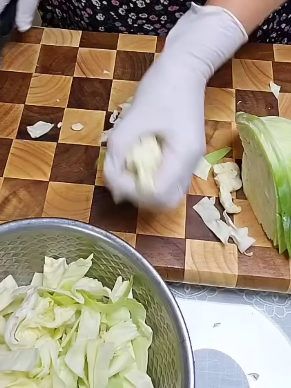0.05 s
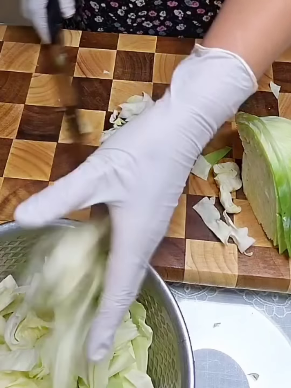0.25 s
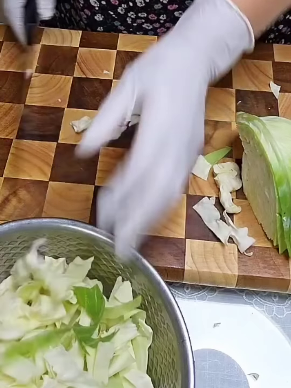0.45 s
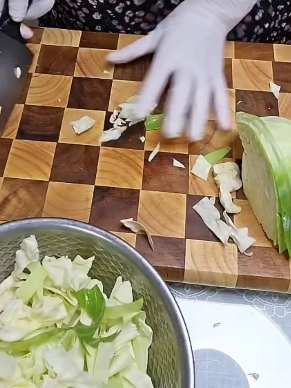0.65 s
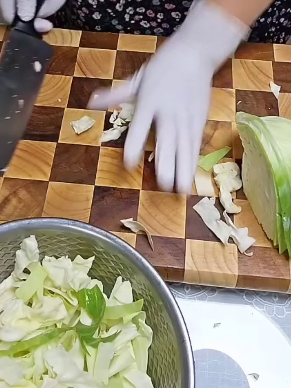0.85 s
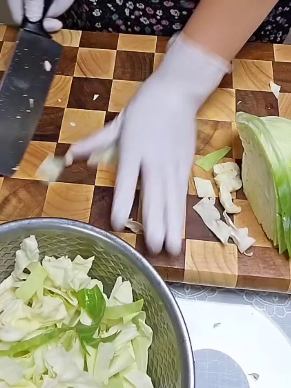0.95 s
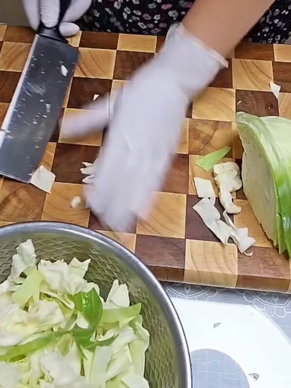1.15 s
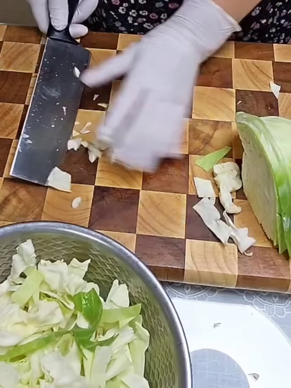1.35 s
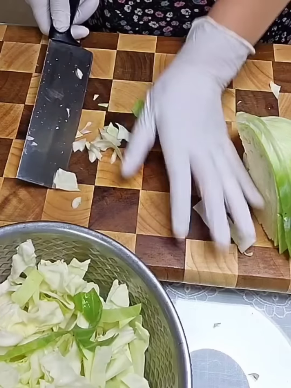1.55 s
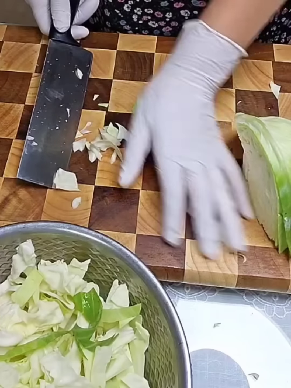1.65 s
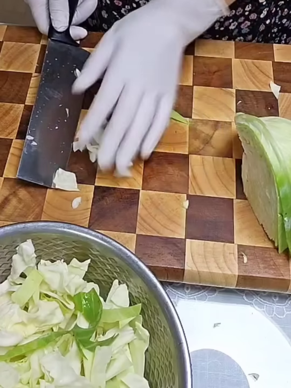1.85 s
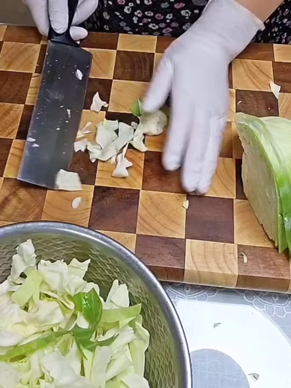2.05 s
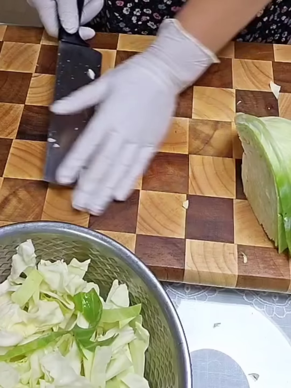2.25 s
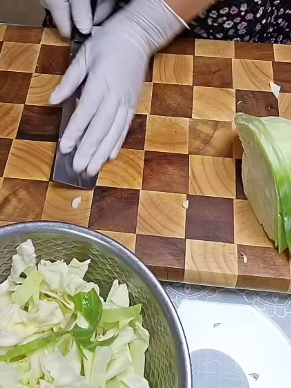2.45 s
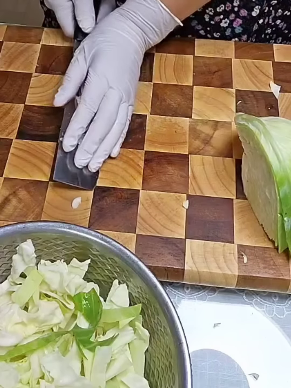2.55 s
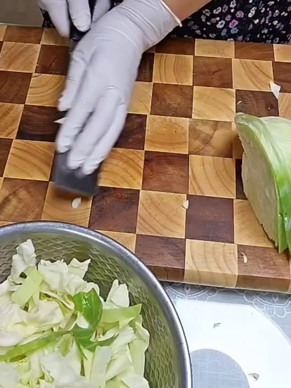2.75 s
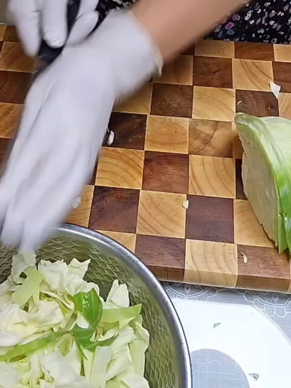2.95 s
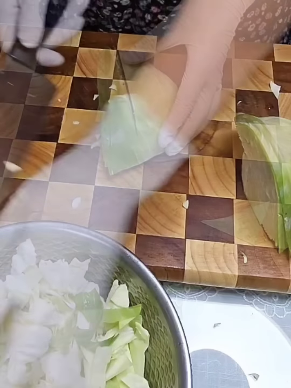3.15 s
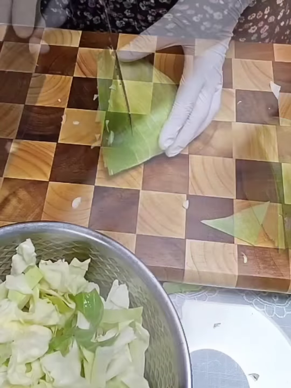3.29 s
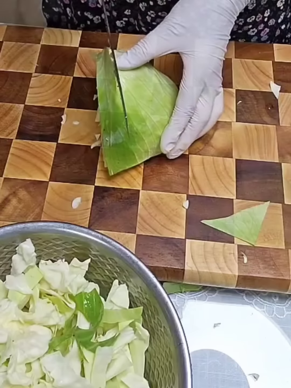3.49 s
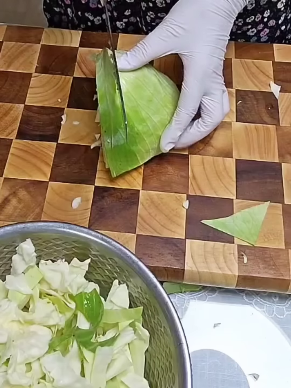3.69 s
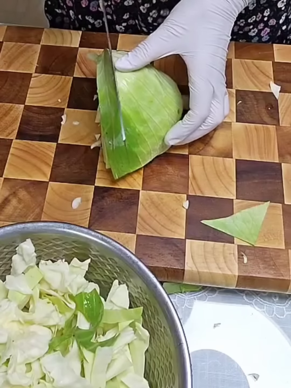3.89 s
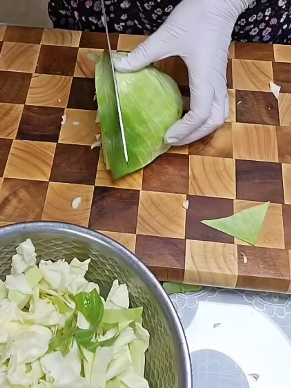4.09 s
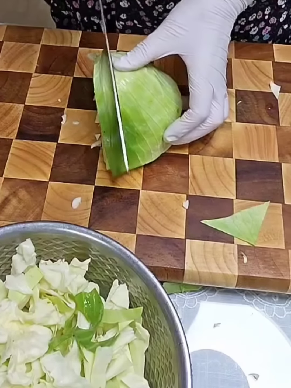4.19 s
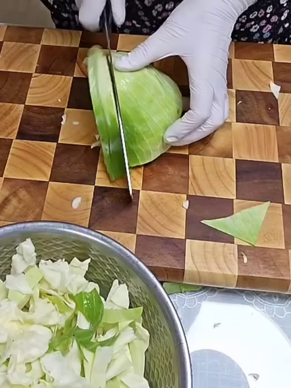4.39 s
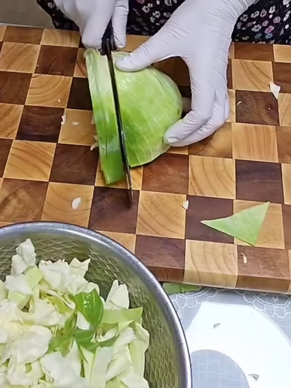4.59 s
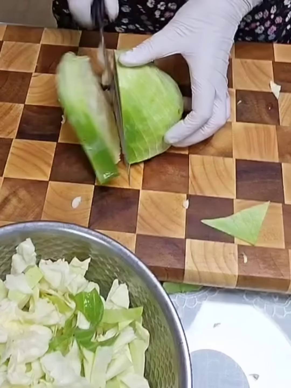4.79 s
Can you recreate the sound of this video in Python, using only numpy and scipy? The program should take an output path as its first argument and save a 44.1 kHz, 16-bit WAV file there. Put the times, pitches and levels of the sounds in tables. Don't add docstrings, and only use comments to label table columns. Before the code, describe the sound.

Close phone pickup in a small kitchen. A knife heel knocks a wooden board and scrapes briefly, then the blade is laid flat with a bright clack. A gloved hand brushes scraps away in soft hissing strokes with small ticks. After a quiet gap, cabbage is sliced in two crackling pushes, the second ending in a loud thud of the edge on wood.

```python
import sys
import numpy as np
from scipy import signal
from scipy.fft import rfft, irfft
from scipy.io import wavfile
from scipy.ndimage import uniform_filter1d

SR = 44100
rng = np.random.default_rng(int(sys.argv[2]) if len(sys.argv) > 2 else 0)


def wrap_up_sound(samples):
    columns = np.atleast_2d(samples).T
    tamed = np.clip(columns, -1, 1)
    steps = np.round(tamed * 32767).astype(np.int16)
    wavfile.write(sys.argv[1], SR, steps)


def invert_db(level):
    return 10 ** (np.asarray(level, dtype=float) / 20)


N = 301644
T = np.arange(N) / SR


def evened(x):
    return x / np.sqrt(np.mean(x ** 2) + 1e-20)


def read(points, hz):
    f, value = np.transpose(points)
    return np.interp(np.log(hz + 1), np.log(f + 1), value)


def add(mix, s, sound):
    part = mix[max(round(s * SR), 0):][:len(sound)]
    part += sound[:len(part)]


def noise_like(length):
    return rng.standard_normal(length)


def colour(x, points):
    response = invert_db(read(points, np.fft.rfftfreq(N, 1 / SR)))
    return evened(irfft(rfft(x) * response, N))


def resonate(x, hz, width):
    r = np.exp(-np.pi * width / SR)
    poles = [1, -2 * r * np.cos(2 * np.pi * hz / SR), r * r]
    return evened(signal.lfilter([1, 0, -1], poles, x))


def grit(per_s, spread_db, smooth):
    size = invert_db(spread_db * np.minimum(rng.exponential(1, N), 4)) * rng.choice([-1., 1.], N)
    hits = rng.random(N) < per_s / SR
    return evened(size * hits) + smooth * noise_like(N)


def play(curve, x):
    s, db = np.transpose(curve)
    fade = np.clip(np.minimum((T - s[0]) / .002, 1 + (s[-1] - T) / .012), 0, 1)
    return fade * invert_db(np.interp(T, s, db)) * x


def contact(start, rise, hold, fall_db_per_s, onset_db, curve):
    t = T[::32] - start
    rising_db = onset_db * np.clip(1 - t / rise, 0, 1) ** curve
    falling_db = -fall_db_per_s * np.maximum(t - rise - hold, 0)
    return np.clip(t / .002, 0, 1) * invert_db(np.maximum(rising_db + falling_db, -200))


def blend(gains):
    return np.interp(T, T[::32], np.sqrt(sum(g ** 2 for g in gains)))


def push(start, rise, t60, db):
    full_force = 0.056 * t60
    return invert_db(db) * contact(start, rise, full_force, 60 / t60, onset_db=-9.5, curve=1.6)


def pops():
    t = np.arange(-90, 90) / SR
    total = np.zeros(N)
    for hz in np.geomspace(3200, 5200, 7):
        grain = np.sin(2 * np.pi * hz * t) * np.exp(-(t * hz / 1.5) ** 2)
        total += signal.oaconvolve(grit(per_s=220, spread_db=3.0, smooth=.25), grain, "same")
    return evened(total)


# t/s, rise/s, t60/s, crunch level/dB, weight on the board/dB
FIRST_CUT = [(3.888, 0.028, 0.067, -42.5, -11.5), (3.94, 0.0092, 0.55, -65, -2),
             (4.003, .008, 0.044, -53, -7), (4.114, 0.0026, 0.063, -54.5, 2), (4.145, 0.01, 0.25, -42, -5),
             (4.294, 0.016, 0.14, -43, -17), (4.335, 0.018, 0.049, -44.5, -7),
             (4.372, 0.072, 0.47, -45, -5.5), (4.495, .008, 0.55, -54.5, 1), (4.553, 0.026, 0.14, -49, -14),
             (4.598, 0.019, 0.27, -50.5, 6.5), (4.76, 0.028, 0.39, -68, 5), (4.85, 0.036, 1, -70.5, 2.5)]
SECOND_CUT = [(5.102, 0.019, 0.062, -45, -7.5), (5.14, 0.0052, 0.98, -69, 2.5),
              (5.546, .002, 0.94, -62, -11), (5.58, 0.0058, 0.033, -72, -21),
              (5.611, 0.002, 0.049, -54, -2), (5.648, 0.0041, 0.1, -46, -22),
              (5.681, 0.048, 0.28, -42.5, -10), (5.759, 0.067, 0.3, -45.5, -8),
              (5.93, 0.044, 0.27, -54, -3), (5.977, 0.041, 0.21, -42, -5.5),
              (6.045, 0.047, 0.42, -48.5, 1.5), (6.255, .01, 0.64, -68, -4), (6.36, .06, 0.68, -69.5, -19),
              (5.3, 0.07, 0.71, -83, 11.5), (6.453, 0.03, 0.55, -61.5, -3.5)]
# f/Hz, level/dB per Hz
CRUNCH = [(880, -6.5), (1500, -11), (1920, -10), (2600, -13.5), (3200, -11), (3840, -12.5), (4770, -13.5),
          (6270, -17), (8920, -5.5), (11600, -7.5), (14900, -5.5), (15600, -1.5)]


def cuts(board):
    clumps = invert_db(2.4 * evened(uniform_filter1d(noise_like(N), 200)))
    crunch = colour(clumps * grit(per_s=1600, spread_db=3.0, smooth=3.2), [(500, -19)] + CRUNCH)
    body = evened(signal.sosfilt(signal.butter(4, 6000, "low", fs=SR, output="sos"), crunch))
    fizz = evened(signal.sosfilt(signal.butter(4, 6000, "high", fs=SR, output="sos"), crunch))

    rows = FIRST_CUT + SECOND_CUT
    pushes = [push(*row[:-1]) for row in rows]
    force = blend(pushes)
    weight = blend(invert_db(row[-1]) * g for row, g in zip(rows, pushes))
    spray = invert_db(-2) * force
    return force * evened(body + 0.67 * pops()) + weight * board + spray * fizz


# t/s, peak
# level/dB, f/Hz, t60/s
CRACKS = [(3.898, -32.5, 4000, .06), (3.906, -32, 4550, .05), (3.915, -41, 4000, 0.032),
          (4.416, -37, 2100, .03), (4.66, -46, 3240, .06), (4.0075, -43, 3800, .06), (4.147, -30, 3600, .05),
          (4.1535, -34, 4070, 0.05), (4.163, -34.5, 3700, 0.057), (4.176, -45, 3900, 0.055),
          (4.198, -45, 4200, 0.045), (4.308, -49, 3740, 0.074), (4.379, -43, 3040, 0.036),
          (4.418, -39, 4500, .05), (4.4892, -24, 3120, 0.023), (4.568, -46, 3330, 0.035),
          (5.652, -40, 3760, 0.063), (5.684, -43, 3900, .1), (5.692, -39, 3900, 0.1),
          (5.728, -30.5, 4300, 0.07), (5.74, -38, 4000, .06), (5.767, -38.5, 3900, .1),
          (5.7982, -39.5, 4200, 0.062), (5.819, -44, 4100, 0.097), (5.981, -42, 3320, .06),
          (5.9853, -37, 4500, 0.078), (6.009, -40, 3700, 0.091), (6.0349, -23, 3110, 0.037),
          (6.106, -38, 1600, .04), (6.175, -41, 1300, .04), (6.169, -45, 3990, .05), (0.15, -38, 3000, 0.019),
          (0.505, -38.5, 3460, 0.053), (0.547, -45, 5300, .08), (0.546, -54, 9000, 0.071),
          (0.832, -40, 3600, 0.093), (1.1522, -44.5, 2880, .06), (1.975, -56, 1890, 0.054),
          (1.975, -52, 4600, .05), (0.508, -45, 1200, .08), (3.353, -52, 5300, .06),
          (3.368, -50, 4300, 0.041), (3.357, -51, 1350, 0.072)]


def ribs():
    out, t = np.zeros(N), np.arange(6000) / SR
    onset = 1 - np.exp(-t / 0.00078)
    for s, db, hz, t60 in CRACKS:
        unevenness = evened(uniform_filter1d(noise_like(len(t)), size=40))
        cracks = noise_like(len(t)) * invert_db(2.9 * unevenness)
        run = resonate(cracks, hz, width=0.14 * hz)
        add(out, s, invert_db(db - 4 - 60 * t / t60) * onset * run)
    return out


# t/s, peak level/dB, f/Hz, burst length/s
TICKS = [(0.001, -41.5, 4640, 0.0083), (0.03, -39.5, 3800, 0.0056), (0.057, -33.5, 4070, 0.0014),
         (0.099, -51, 8350, 0.001), (0.48, -50, 11000, 0.004), (0.483, -48, 4180, 0.0013),
         (0.51, -43.5, 8100, 0.0062), (1.821, -55, 4620, .002), (0.651, -50.5, 6650, 0.0079),
         (0.718, -49.5, 7460, 0.0047), (0.782, -47, 4350, 0.0037), (1.156, -45, 5460, 0.0026),
         (1.976, -45.5, 8500, 0.0028), (2.26, -52, 5600, .002), (2.268, -50, 5100, 0.0062),
         (2.524, -47, 5120, 0.0015), (2.808, -37.5, 6400, 0.0018), (2.8162, -42.5, 5140, 0.0021),
         (3.358, -45, 5460, 0.00087), (3.362, -47, 6000, 0.0011), (3.448, -64, 8900, .002)]
# t/s, peak level/dB, f/Hz, burst length/s
SNAPS = [(3.892, -24.5, 4680, 0.0012), (3.899, -25.5, 3800, 0.0019), (4.007, -42, 3830, 0.0047),
         (4.04, -46, 4050, 0.00082), (4.115, -42, 3260, 0.00077), (5.551, -53, 8700, 0.0017),
         (5.586, -33.5, 8400, 0.00055), (5.562, -50, 8800, .001), (5.579, -47.5, 9000, .001),
         (5.609, -36, 7850, 0.0014), (5.613, -34, 5070, 0.00092), (5.656, -39, 7000, 0.0023),
         (5.7285, -32, 4300, 0.001), (5.777, -32, 4000, .001), (5.7995, -42.5, 4200, .001),
         (4.1517, -27, 4340, 0.00089), (4.155, -29, 3830, 0.0018), (4.002, -44, 4900, 0.0011),
         (4.091, -51, 4500, 0.0018), (5.982, -48, 4170, 0.0034), (6.077, -35, 5040, 0.0009),
         (6.131, -39, 6000, 0.0015), (6.481, -48.5, 4170, 0.0043), (6.268, -50, 5000, 0.0007),
         (6.324, -61.5, 6000, .0008), (6.41, -48, 6450, 0.00077), (6.556, -51, 4580, .001),
         (6.612, -49.5, 5500, .0008)]


def snaps():
    out, t = np.zeros(N), np.arange(-200, 1800) / SR
    for s, db, hz, length in TICKS + SNAPS:
        burst_db = -6 - 1.1 * max(db + 34, 0)
        ring = np.cos(2 * np.pi * hz * t) * np.exp(-(t / (.00012 + .12 * length)) ** 2)
        swell = np.exp(-np.maximum(t, -4 * t) / (1.5 * length))
        burst = resonate(noise_like(len(t)), hz, width=5600) * swell
        snap = invert_db(db) * (0.99 * ring + invert_db(burst_db) * burst)
        start = s + t[0]
        already_past = max(round(-start * SR), 0)
        add(out, start, snap[already_past:])
    return out


def knocks(events, modes, crack_hz, edge_db, focus, loose):
    out, t = np.zeros(N), np.arange(9000) / SR
    hz, mode_db, t60 = np.transpose(modes)[:, :, None]
    for s, db, pitch_hz, ring_db in events:
        blow = np.sin(2 * np.pi * pitch_hz * t) * np.exp(-((t - .0025) / 0.0016) ** 2)

        near_db = mode_db - focus * np.log2(hz / pitch_hz) ** 2
        rattle = evened(uniform_filter1d(noise_like((len(hz), len(t))), 150))
        chatter = 1 + loose * np.tanh(t / 0.013) * rattle
        phase = loose * rng.random((len(modes), 1))
        tones = np.sin(2 * np.pi * (hz * t + phase))
        ring = (invert_db(near_db - 60 * t / t60) * chatter * tones).sum(0)
        ring *= 1 - np.exp(-t / 0.0042)

        edge = resonate(noise_like(len(t)), crack_hz, width=0.28 * crack_hz)
        edge *= np.exp(-t / 0.004) * (1 - np.exp(-t / 0.0047))
        add(out, s, invert_db(db) * (blow + invert_db(ring_db) * ring / abs(ring).max() + invert_db(edge_db) * edge))
    return out


# t/s, peak level/dB, struck f/Hz, ring share level/dB
LANDING = [
    (6.034, -11.5, 700, -1.5),
    (6.048, -25.5, 800, -7),
    (6.058, -28.5, 730, -8),
    (6.069, -29, 760, -8),
    (6.087, -37, 800, -2),
]
# f/Hz, level/dB, t60/s
LANDING_MODES = [(289, -14.5, 0.064), (350, -13, 0.022), (550, -2.5, 0.013), (700, -2.5, 0.042),
                 (864, -24, 0.15), (1036, -1, 0.025), (1460, -6, 0.043), (1694, 8, 0.016), (2490, -29, .02),
                 (2850, -0.5, 0.013)]


def landing():
    return knocks(LANDING, LANDING_MODES, crack_hz=2470, edge_db=-7.0, focus=0.52, loose=0.81)


# t/s, peak level/dB, struck f/Hz, ring share level/dB
WEDGE_KNOCKS = [(4.309, -38, 900, -6), (4.347, -35.5, 800, -8.5), (4.326, -38, 795, -14),
                (4.765, -48.5, 463, -1), (4.489, -19, 700, -10), (4.586, -19.5, 700, -11.5),
                (4.618, -53, 630, -21), (6.103, -29.5, 980, -9.5), (6.109, -34, 1480, -14),
                (6.127, -37, 730, -17), (6.173, -38, 980, 0), (6.48, -46, 684, -8)]
# f/Hz, level/dB, t60/s
WEDGE_MODES = [(271, 3, 0.13), (389, 2, 0.11), (479, 0.5, 0.085), (536, -28, 0.02), (580, -20, 0.04),
               (709, 5, 0.057), (870, -35, 0.033), (1126, 6.5, 0.041), (1487, 16, 0.022),
               (1770, 17.5, 0.015), (2056, 5.5, 0.045), (2950, -14, .03)]


def wedge_knocks():
    return knocks(WEDGE_KNOCKS, WEDGE_MODES, crack_hz=2800, edge_db=-11.5, focus=1.17, loose=0.81)


# t/s, peak level/dB, struck f/Hz, ring share level/dB
MORE_ROCKS = [
    (4.415, -47.5, 710, 7.5),
    (5.807, -49.5, 686, 6.5),
    (5.825, -48, 646, 4.5),
    (5.845, -46.5, 680, 10),
    (5.867, -53, 720, 5.5),
]
# f/Hz, level/dB, t60/s
MORE_ROCK_MODES = [(642, -13.5, 0.08), (687, 0.5, 0.031), (878, -19, 0.023)]


def more_rocks():
    return knocks(MORE_ROCKS, MORE_ROCK_MODES, crack_hz=1980, edge_db=-21.0, focus=2.8, loose=0.81)


# t/s, peak level/dB, struck f/Hz, ring share level/dB
ROCKS = [
    (5.1035, -50.5, 660, 11),
    (5.1155, -43, 630, 10),
    (5.161, -56, 680, 6),
]
# f/Hz, level/dB, t60/s
ROCK_MODES = [(612.6, 1, 0.1), (667, 5, 0.045), (870, -19, 0.072), (1066, 2.5, 0.022), (1480, -8, 0.042)]


def rocks():
    return knocks(ROCKS, ROCK_MODES, crack_hz=2030, edge_db=-17, focus=0.3, loose=0.22)


# t/s, peak level/dB, struck f/Hz, ring share level/dB
HEEL_KNOCK = [
    (0.1468, -21.5, 1113, -2),
    (0.154, -27, 880, -16),
    (0.161, -30, 700, -13),
]
# f/Hz, level/dB, t60/s
HEEL_MODES = [(276, -10.5, 0.054), (590, -42, 0.049), (630, 4.5, 0.11), (743, 9, 0.047), (910, -9, 0.064),
              (1036, 1.5, 0.13), (1436, 2, 0.071), (1587, 11.5, 0.026), (1950, -6, 0.039)]


def heel_knock():
    return knocks(HEEL_KNOCK, HEEL_MODES, crack_hz=2880, edge_db=-16.0, focus=0.35, loose=0.36)


# t/s, peak level/dB, struck f/Hz, ring share level/dB
FLAT_KNOCKS = [
    (0.831, -19.5, 1507, -2.5),
    (0.838, -27, 1260, -4),
    (1.152, -45, 830, -0.7),
]
# f/Hz, level/dB, t60/s
FLAT_MODES = [(630, 5, 0.053), (863, 8, 0.033), (1062, -6, 0.15), (1486, -16, 0.15), (1586, -7, 0.23),
              (1760, -6, 0.14), (1400, -11, .1), (1704, -5, .12), (2343, -1.5, 0.047), (2400, -1, 0.034),
              (754, 9, 0.035), (3507, -6, 0.093), (4300, -24, 0.029), (5350, -23, 0.086)]


def flat_knocks():
    return knocks(FLAT_KNOCKS, FLAT_MODES, crack_hz=4430, edge_db=-6.5, focus=0.99, loose=0.62)


# f/Hz, width/Hz, level/dB
BLADE = [(1690, 27, -12), (1835, 13, 1), (2390, 23, -3.5), (3200, 29, -0.5), (3600, 32, -2),
         (3820, 26, 3.5), (4270, 51, -26), (4650, 28, -0.5), (5120, 53, -8), (5610, 94, -11.5),
         (6340, 110, -11.5), (7080, 52, -11), (6970, 22, -16), (7300, 28, -20), (8100, 49, -1),
         (8940, 320, -7.5), (10000, 110, -12), (9850, 41, -7), (10060, 56, -5), (10600, 54, -7),
         (10900, 29, -2), (10970, 63, -21), (11600, 22, -27), (12200, 75, -10), (13300, 92, -29),
         (13800, 44, -8), (14200, 20, -25), (14400, 46, -5), (14900, 58, -23), (14600, 93, -13)]


def blade_ring():
    drive = grit(per_s=1600, spread_db=-2.5, smooth=1.1)
    flares = invert_db(3.5 * evened(uniform_filter1d(noise_like((len(BLADE), N // 100 + 1)), 5)))
    flares = np.repeat(flares, 100, axis=1)[:, :N]
    total = np.zeros(N)
    for (hz, w, db), flare in zip(BLADE, flares):
        mode = resonate(drive, hz, w * (.6 + hz / 40000))
        total += invert_db(db) * np.sqrt(w) * flare * mode
    return evened(total)


# t/s, level/dB
SCRAPE = [
    (0.17, -55.5),
    (0.212, -50.5),
    (0.224, -45),
    (0.326, -41.5),
    (0.378, -39.5),
    (0.404, -41),
    (0.43, -50),
    (0.47, -67),
]
# f/Hz, level/dB per Hz
SCRAPE_HISS = [(880, -24), (1500, -9), (2160, -17), (2380, -14), (3800, -3.5), (6590, -14), (7930, -9),
               (15600, -14.5)]


def scrape(board, blade):
    hiss = colour(noise_like(N), SCRAPE_HISS)
    return play(SCRAPE, evened(blade + .55 * hiss) + invert_db(-13) * board)


# t/s, rise/s, hold/s, swish level/dB, weight on the board/dB
SWEEP = [(0.453, 0.024, .005, -54.5, -6), (0.582, .01, 0.48, -68, -5), (0.85, 0.095, 0.26, -55.5, -6),
         (1.274, 0.1, 0.0054, -52.5, -9.5), (1.537, 0.12, 0.81, -75, 3.5), (1.777, .1, 0.051, -62, -9),
         (2.193, 0.068, 0.037, -58.5, -2), (2.325, 0.023, 0.054, -59, -3), (2.465, 0.098, 0.003, -58.5, -4),
         (2.799, .003, 0.011, -60.5, -1.5), (2.997, 0.11, 0.071, -75.5, -12)]
# f/Hz, level/dB per Hz
SWISH = [(880, -13), (1500, -5), (1940, -5.5), (2160, -11.5), (3070, -4), (5060, -2.5), (6650, -9),
         (9280, -7.5), (11700, -13), (15600, -3)]


def sweep(board, blade):
    patches = invert_db(1.6 * evened(uniform_filter1d(noise_like(N), 400)))
    hiss = colour(patches * grit(per_s=900, spread_db=3.5, smooth=1.8), SWISH)
    strokes = [invert_db(db) * contact(s, rise, hold, fall_db_per_s=119, onset_db=-11.5, curve=1)
               for s, rise, hold, db, _ in SWEEP]
    weight = blend(invert_db(row[-1]) * g for row, g in zip(SWEEP, strokes))
    return blend(strokes) * invert_db(2.5) * (hiss + 0.36 * blade) + weight * board


# f/Hz, level/dB
BOARD = [(280, -6.5), (480, -3), (635, 6), (700, 5.5), (880, -1), (1077, -3.5), (1470, -5), (1744, -13)]


def rumble():
    drive = grit(per_s=490, spread_db=1.0, smooth=0.67)
    total = np.zeros(N)
    for k, (hz, db) in enumerate(BOARD):
        total += (-1) ** k * invert_db(db) * resonate(drive, hz, width=110)
    return evened(total)


# t/s, peak level/dB
THUMPS = [(0.15, -50), (0.846, -46), (3.907, -47), (4.15, -43.5), (4.312, -48), (4.489, -38.5),
          (4.587, -41), (4.673, -32.5), (5.121, -55), (6.037, -31), (6.175, -36.5)]


def thumps():
    out, t = np.zeros(N), np.arange(SR // 2) / SR
    boom = np.sin(2 * np.pi * 144.8 * t) + 0.38 * np.sin(2 * np.pi * 132.3 * t)
    boom *= 1 - np.exp(-t / 0.0057)
    t60 = 0.33
    for s, db in THUMPS:
        add(out, s, invert_db(db - 4 - 60 * t / t60) * boom)
    return out


# f/Hz, t60/s
ROOM = [(200, 0.15), (1000, 0.39), (4000, 0.31), (12000, 0.33)]


def room(x):
    taps = np.zeros(SR // 2)
    at = np.arange(150, len(taps) - 20, 20)
    taps[at + rng.integers(0, 20, len(at))] = rng.choice([-1., 1.], len(at))
    hz, t, z = signal.stft(taps, SR, nperseg=256)
    decay = invert_db(-60 * t / read(ROOM, hz)[:, None])
    tail = signal.istft(z * decay, SR, nperseg=256)[1]
    return signal.fftconvolve(x, tail / np.linalg.norm(tail))[:N]


# f/Hz, level/dB per Hz
AIR = [(120, -50), (200, -2), (358, -3.5), (393, -8.5), (430, -2.5), (507, -9.5), (876, -3.5), (1170, -8.5),
       (1660, -14), (2140, -23.5), (3080, -18), (4280, -9.5), (5400, -11), (5900, -20.5), (7000, -22),
       (9710, -18), (12300, -30), (15600, -32)]
# f/Hz, width/Hz, level/dB
HUM = [(34, 36, -99.5), (56, 11, -79), (133.3, 20, -70.5), (234, 70, -77), (3060, 73, -78),
       (3810, 150, -80), (4640, 48, -87)]
# t/s, level/dB
SHAKE = [(0.0, -60), (0.28, -82), (0.59, -58.5), (1.75, -89), (1.98, -66.5), (3.14, -79), (3.27, -63),
         (3.52, -80), (4.71, -53), (4.91, -66), (5.6, -81), (5.68, -60.5), (6.13, -54), (6.84, -75.5)]


def kitchen():
    drift = evened(uniform_filter1d(noise_like(N), size=6000))
    air = invert_db(-66.5 + 0.27 * drift) * colour(noise_like(N), [(100, -49.0)] + AIR)
    hum = sum(invert_db(db) * resonate(noise_like(N), hz, w) for hz, w, db in HUM)
    shake = colour(noise_like(N), [(10, 5.5), (25, -3.5), (60, 19.5), (90, 1.0), (130, -29)])
    return air + hum + play(SHAKE, invert_db(-2.0) * shake)


def scene():
    board, blade = rumble(), blade_ring()
    rubs = cuts(board) + scrape(board, blade) + sweep(board, blade)
    hits = ribs() + snaps()
    hits += landing() + wedge_knocks() + more_rocks() + rocks() + heel_knock() + flat_knocks()
    echo = room(invert_db(-9.0) * hits + invert_db(-10) * rubs)
    return (hits + rubs + thumps() + echo + kitchen())[None]


def roll_off(x):
    return signal.sosfilt(signal.butter(12, 16660, fs=SR, output="sos"), x)


def record(dry):
    def low_pass(hz):
        return signal.oaconvolve(dry, signal.firwin(801, hz, window=("kaiser", 8), fs=SR)[None], "same")

    low = low_pass(15500)
    top = low_pass(16300) - low
    running_mean = abs(uniform_filter1d(top ** 2, size=4096)) + 1e-14
    jump = uniform_filter1d(top ** 2, size=128) / running_mean
    clicks = top * np.clip(jump - 6.5, 0, 1)
    return roll_off(low + invert_db(-16) * clicks)


dry = scene()
out = record(dry)
wrap_up_sound(out)
```